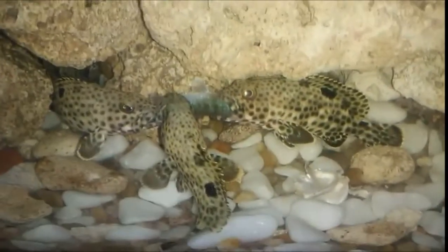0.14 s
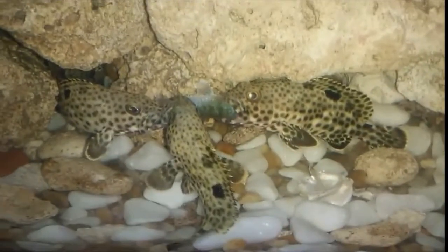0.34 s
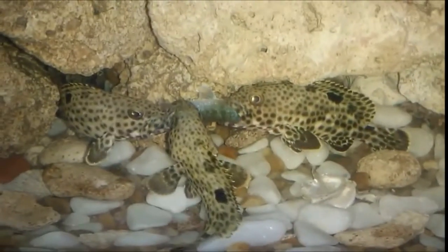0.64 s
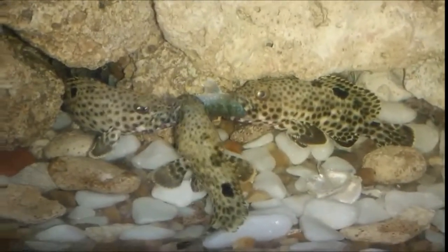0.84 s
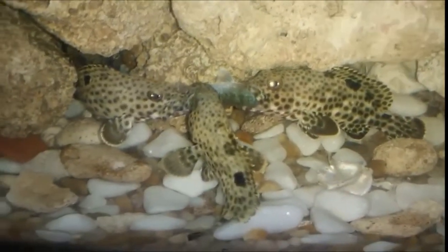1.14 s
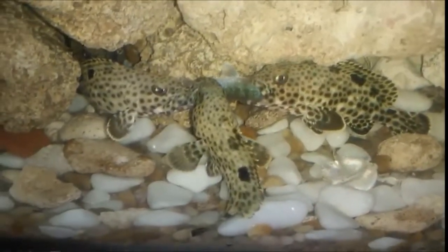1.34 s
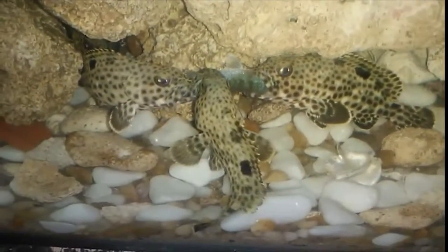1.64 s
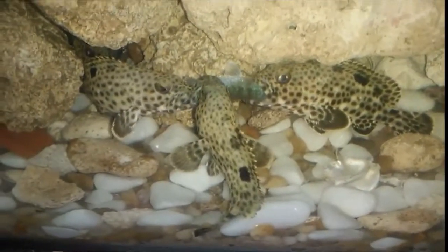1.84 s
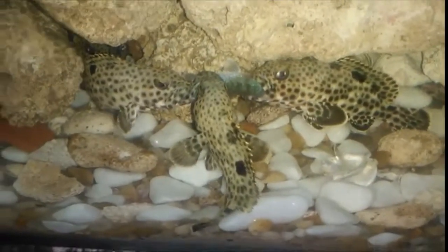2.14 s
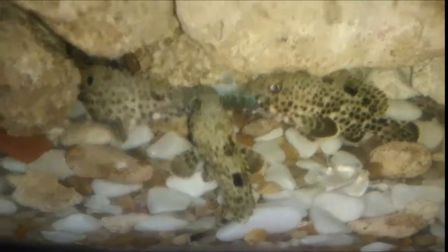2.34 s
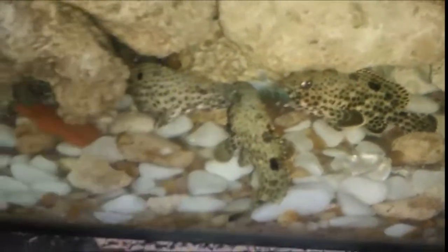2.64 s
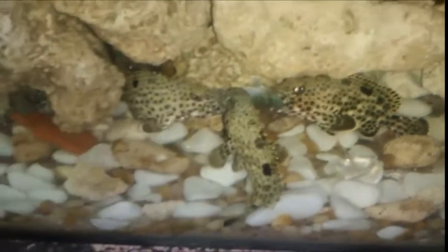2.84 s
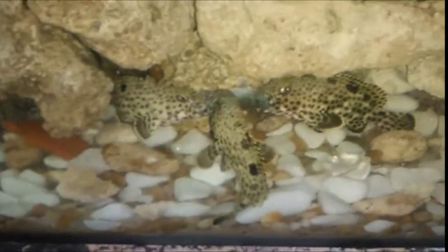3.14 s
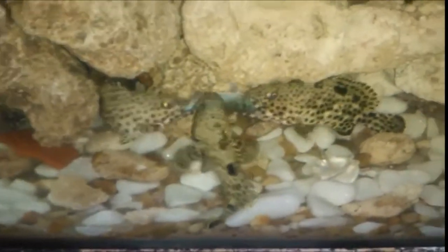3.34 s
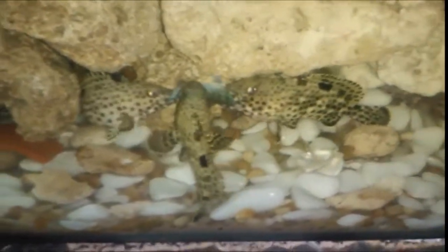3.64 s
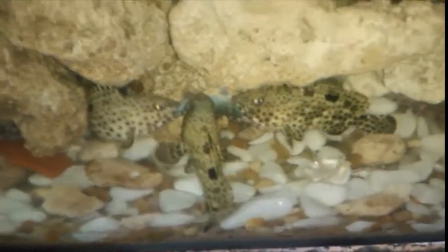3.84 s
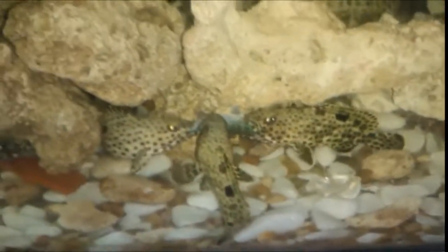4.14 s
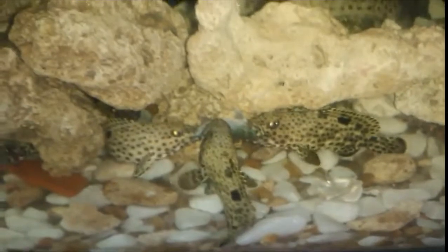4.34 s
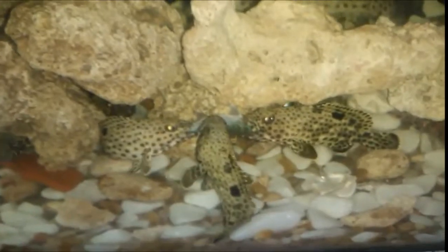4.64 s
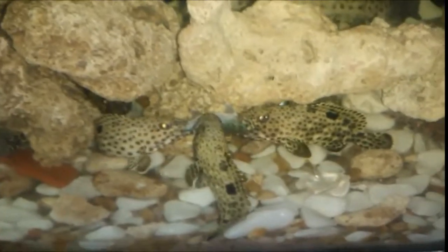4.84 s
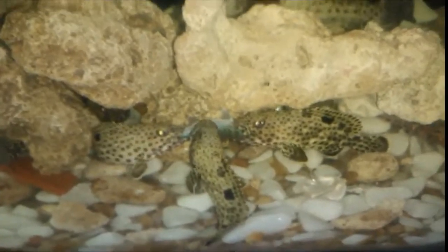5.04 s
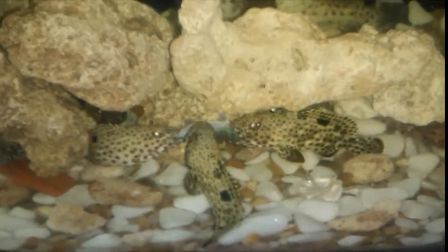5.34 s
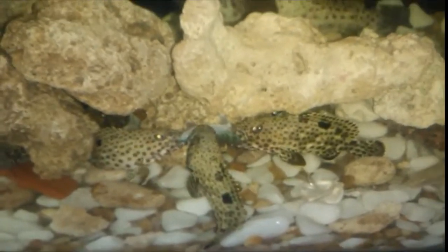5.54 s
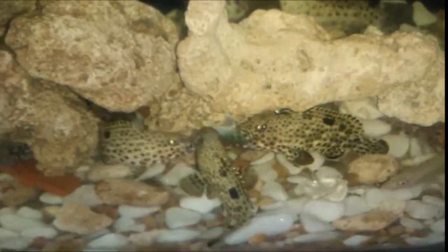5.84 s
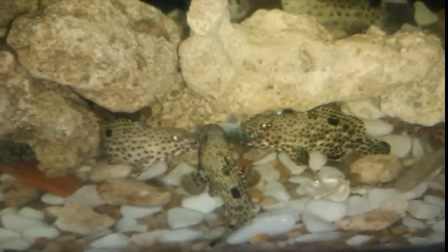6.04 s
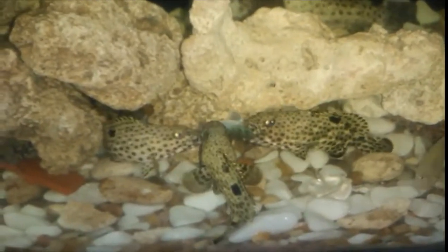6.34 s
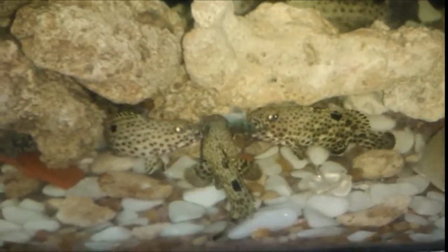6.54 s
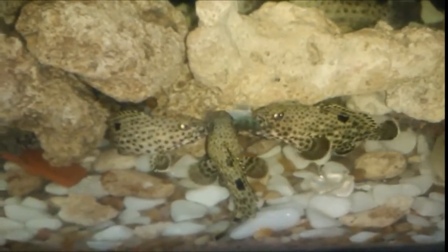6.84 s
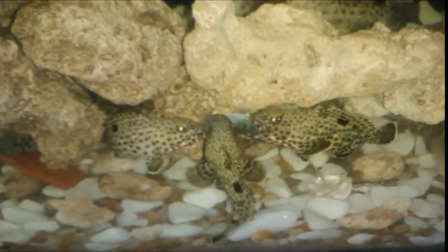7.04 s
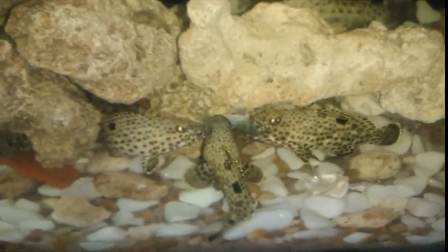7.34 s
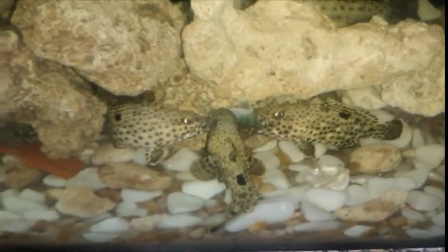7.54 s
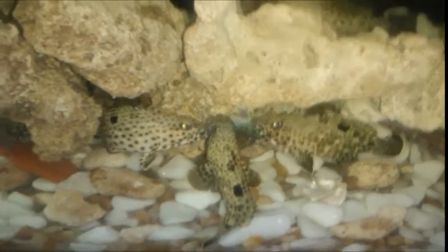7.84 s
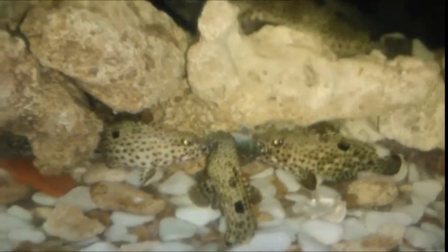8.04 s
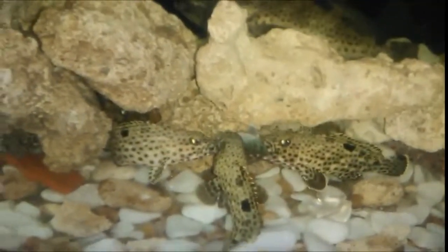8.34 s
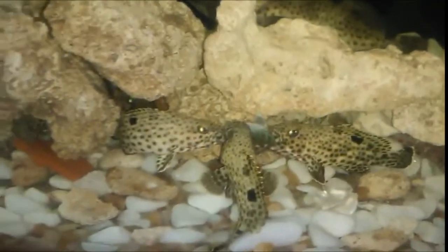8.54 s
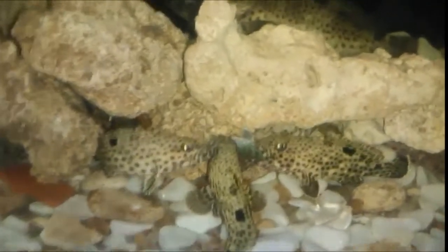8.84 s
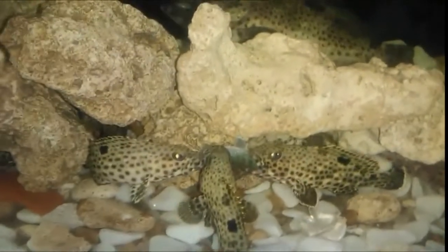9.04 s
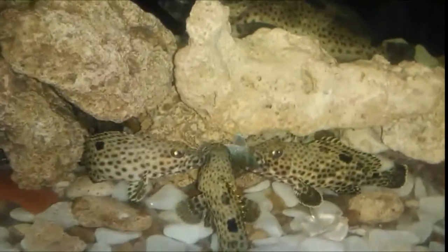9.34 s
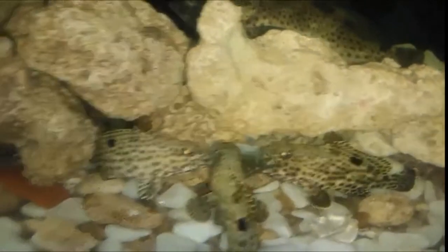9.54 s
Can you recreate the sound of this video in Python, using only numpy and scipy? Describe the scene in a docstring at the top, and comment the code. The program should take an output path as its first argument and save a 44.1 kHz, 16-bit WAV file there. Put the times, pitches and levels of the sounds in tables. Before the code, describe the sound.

Water runs into a fish tank with bubbling, plinking drops and a recurring plop, with two short dropouts and one louder stretch.

```python
"""Water runs into an aquarium: a wash of tiny ringing bubbles that surges with every splash.
Drops plink as they trap air or just smack the surface, spray tinkles faintly and one sharp plop
cuts through, over a pump's hum. It all sounds muffled, in a small room, on the left channel only.
One 1.8 s stretch repeats as a loop, with two silent gaps, one overlap and one louder pass."""
import sys
import numpy as np
from scipy import signal
from scipy.fft import rfft, irfft, next_fast_len
from scipy.io import wavfile
from scipy.ndimage import map_coordinates

SR = 44100
rng = np.random.default_rng(int(sys.argv[2]) if len(sys.argv) > 2 else 0)


def store_wav(level_fs):
    """Save 16-bit WAV to argv[1]."""
    pcm = np.round(np.clip(np.atleast_2d(level_fs), -1, 1) * 32767)
    wavfile.write(sys.argv[1], SR, pcm.T.astype(np.int16))


N = 426888

LOOP_START_S, LOOP_LENGTH_S = 6.5567, 1.8
SIZE = round(LOOP_LENGTH_S * SR)
TIME = LOOP_START_S + np.arange(SIZE) / SR  # the water's cues are timed on the loud pass

# Passes of the loop. Each row: start in seconds, gain in dB.
LOOP_PASSES = [(-.9433, -9.5), (1.0233, -9.5), (2.6567, -9.5), (4.4567, -9.5), (6.5567, 0), (8.3567, -9.5)]
# The pump's hum and the tank tones it stirs. Each row: pitch in Hz, level in dB.
HUM_TONES = [(120, -82), (180, -75), (297, -66.5), (360, -61.5), (420, -71.5), (540, -63), (628, -61.5),
             (948, -68.5), (1002, -81.5), (1620, -69.5), (1920, -61.5), (2818, -59.5)]
# The EQ curve of the wash. Each row: frequency in Hz, level in dB.
WASH_EQ = [(90, -65.5), (150, -37.5), (200, -17.5), (310, -10), (480, -5.5), (660, -1), (900, -8.5),
           (1500, -8.5), (1850, -1), (2400, -5), (2950, -7), (3700, -11.5), (4250, -15), (4450, -47),
           (4900, -25.5)]
# Tank resonances that colour the water. Each row: centre in Hz, width in Hz, gain in dB.
TANK_RESONANCES = [(649, 63, -0.5), (1765, 73, 5), (2010, 150, 2.5), (2730, 25, 7), (2854, 8.7, 11.5),
                   (3045, 110, 4), (3418, 19, 9.5), (4100, 270, 4), (4620, 23, 8.5)]
# Faint, high tinkles of spray. Each row: start in seconds, pitch in Hz, level in dB, attack in seconds.
SPRAY_TINKLES = [(6.745, 6940, -80.5, 0.015), (6.892, 5510, -75, .004), (6.9, 6870, -83.5, 0.0028),
                 (7.191, 7940, -65.5, 0.0016), (7.4, 6480, -67, .002), (7.403, 7500, -75, 0.0014),
                 (7.48, 5400, -73.5, 0.017), (7.539, 5770, -67.5, .043), (7.927, 8450, -84.5, 0.0038),
                 (8.04, 6210, -69.5, .002), (8.122, 7860, -75, 0.0013), (8.189, 7330, -67.5, 0.015),
                 (8.19, 4670, -54, 0.034), (8.343, 7200, -64.5, 0.011)]
# The plop. In order: time in seconds, then pitch in Hz, level in dB and decay time in seconds
# for the snap, then the same three for the thud.
PLOP_HIT = (8.27745, 1690, -22, .00039, 520, -15.5, .00055)
# Drops that smack without ringing. Each row: time of the peak in seconds, pitch in Hz, level in dB.
SURFACE_SMACKS = [(6.809, 2950, -28.5), (7.1496, 2340, -26.5), (7.3124, 2340, -22), (7.6472, 2980, -21.5),
                  (7.6999, 3020, -24.5), (8.3487, 2660, -22)]
# Drops that trap a bubble. Each row: time of the peak in seconds, pitch in Hz, level in dB.
RINGING_DROPS = [(6.6653, 2660, -30.5), (6.7077, 3480, -36), (6.7424, 635, -37.5), (6.8137, 3960, -31),
                 (6.8796, 1800, -42), (7.1528, 2734, -27.5), (7.3132, 1957, -30), (7.3245, 4050, -40),
                 (7.3406, 1081, -42.5), (7.4422, 3590, -40.5), (7.5022, 2990, -37.5), (7.5917, 2880, -33.5),
                 (7.6122, 2826, -30.5), (7.651, 3176, -26.5), (7.707, 2910, -33.5), (7.7207, 2970, -31),
                 (7.752, 645, -40), (8.0499, 1680, -34.5), (8.0823, 1040, -41.5), (8.0941, 3130, -35.5),
                 (8.1523, 2144, -34), (8.1975, 638, -42.5), (8.3476, 718, -39.5)]
# Splashes that stir up bubbles. Each row: start in seconds, centre pitch in Hz, level in dB.
SPLASH_BURSTS = [(6.603, 2100, -48), (6.666, 3900, -45.5), (6.736, 920, -44.5), (6.807, 3700, -45.5),
                 (6.993, 4400, -54.5), (7.242, 3600, -45), (7.31, 2900, -41.5), (7.331, 1370, -43),
                 (7.439, 3500, -56), (7.498, 3900, -53), (7.592, 3170, -48), (7.646, 3190, -44.5),
                 (7.698, 2700, -42), (7.749, 805, -44.5), (7.777, 4000, -48), (7.862, 3600, -47),
                 (8.042, 1310, -44.5), (8.092, 3300, -45), (8.187, 700, -50), (8.19, 4000, -51.5),
                 (8.255, 3820, -46)]
# The stream's strength; only its swing about the mean counts. Each row: time in seconds, level in dB.
FLOW_CURVE = [(6.74, -51), (7.164, -56.5), (7.572, -49.5), (8.024, -52), (8.2, -46.5), (8.33, -49.5)]
# The stream's bubbles, large to tiny. Each row: low edge in Hz, high edge in Hz, level in dB,
# dB gained per dB of flow, level of the near bubbles against their echoes in dB.
BUBBLE_BANDS = [(593.6, 900, -55.5, .6, -7.5), (899, 1597, -54, 0.5, -9), (1600, 2700, -51.5, 0.03, -6),
                (2387, 3500, -49.5, 0.19, -7), (3306, 6600, -62.5, 1.73, -4)]


def amp(db):
    """Decibels to gain."""
    return 10 ** (np.asarray(db) / 20)


def unit(x):
    """Scale to rms 1."""
    return x / np.sqrt(np.mean(x ** 2) + 1e-20)


def filtered(x, response):
    """EQ x with a gain curve given as a function of Hz."""
    m = next_fast_len(x.shape[-1] + 8192)
    return irfft(rfft(x, m) * response(np.fft.rfftfreq(m, 1 / SR)), m)[..., :x.shape[-1]]


def below(hz, edge_hz, order):
    """Gain of a low-pass."""
    return 1 / np.sqrt(1 + (hz / edge_hz) ** (2 * order))


def between(hz, lo, hi, order):
    """Gain of a band-pass."""
    return below(hz, hi, order) * below(lo, hz + 1, order)


def wobble(rate):
    """A smooth random drift, with rate turning points a second."""
    return map_coordinates(rng.standard_normal(256), [np.arange(SIZE) * rate / SR], mode="wrap")


def room(x, t60):
    """The small room's diffuse reverb, wet only and about as strong as x."""
    t = np.arange(SR // 3) / SR
    tail = rng.standard_normal(len(t)) * amp(-60 * t / t60) * (1 - np.exp(-t / 0.0038))
    return signal.fftconvolve(x, tail / np.linalg.norm(tail))[:SIZE]


def tank(hz):
    """The tank's tone as a gain curve: the broad wash EQ plus narrow resonances."""
    eq_hz, eq_db = np.transpose(WASH_EQ)
    wash_db = np.interp(np.log(hz + 1), np.log(eq_hz + 1), eq_db)
    resonance_db = sum(db / (1 + (2 * (hz - centre) / width) ** 2)
                       for centre, width, db in TANK_RESONANCES)
    return amp(wash_db + resonance_db)


def pump():
    """The pump lays a steady bed: low churn, slightly wavering hum and a faint hiss."""
    churn = filtered(rng.standard_normal(SIZE), lambda hz: tank(hz) * between(hz, 185, 523, order=14))
    hum = np.zeros(SIZE)
    for pitch, db in HUM_TONES:
        level = amp(db + wobble(3.7)) * np.sqrt(2)
        phase_drift = pitch / 2500 * wobble(2.9)
        hum += level * np.sin(2 * np.pi * pitch * TIME + phase_drift)
    hiss = filtered(rng.standard_normal(SIZE), lambda hz: below(hz, 7000, order=1))
    return amp(-56) * unit(churn) + hum + amp(-76.5) * hiss


def thin_ring(pitch, half_width_hz):
    """A narrow, noisy ring of rms 1."""
    noise = rng.standard_normal(SIZE)
    return unit(filtered(noise, lambda hz: 1 / (1 + ((hz - pitch) / half_width_hz) ** 2)))


def tinkles(t60=0.26):
    """Bursting spray swells quickly into a thin ring that dies away in the room."""
    out = np.zeros(SIZE)
    for start, pitch, db, attack in SPRAY_TINKLES:
        age = np.maximum(TIME - start, 0)
        envelope = np.minimum(age / attack, 1) * amp(db - 60 * np.maximum(age - attack, 0) / t60)
        out += envelope * thin_ring(pitch, half_width_hz=.015 * pitch)
    return out


def plop():
    """One sharp, dry plop: a single-cycle snap and a low thud that dies at once."""
    hit_s, snap_hz, snap_db, snap_decay, thud_hz, thud_db, thud_decay = PLOP_HIT
    t = TIME - hit_s
    snap = amp(snap_db) * np.exp(-(t / snap_decay) ** 2) * np.sin(2 * np.pi * snap_hz * t)
    age = np.maximum(t, 0)
    thud = amp(thud_db) * np.exp(-age / thud_decay) * np.sin(2 * np.pi * thud_hz * age)
    # so small a splash radiates no bass
    thud = signal.sosfilt(signal.butter(2, 220, "highpass", fs=SR, output="sos"), thud)
    return filtered(snap + thud, lambda hz: between(hz, 230, 2600, order=12))


def spatter(t, pitch, decay_s):
    """The wet edge of a drop: a noise burst about an octave wide, peaking at t = 0."""
    burst = rng.standard_normal(SIZE) * np.exp(-np.abs(t) / decay_s)
    return filtered(burst, lambda hz: between(hz, pitch / 1.4, pitch * 1.4, order=6))


def smacks(click_s=.0007):
    """Drops hit the surface: each a tight click inside a short spatter, with a touch of room."""
    hits = np.zeros(SIZE)
    for peak_s, pitch, db in SURFACE_SMACKS:
        t = TIME - peak_s
        click = np.exp(-(t / click_s) ** 2) * np.sin(2 * np.pi * pitch * t)
        hits += amp(db - 2.5) * (click + amp(-2.5) * spatter(t, pitch, decay_s=.0025))
    return filtered(hits + amp(-8) * room(hits, t60=0.22), lambda hz: below(hz, 3750, order=20))


def bubble(t, hz, swell, glide):
    """A bubble swells to its peak at t = 0, then rings out, bending up as it nears the surface."""
    age = np.clip(t / swell + 2, 0, 24)  # counted in swell times; the attack takes two
    envelope = (age / 2) ** 2 * np.exp(2 - age)
    return envelope * np.sin(2 * np.pi * hz * (t + glide * swell * np.logaddexp(age - 2, 2 - age)))


def drops(swell_cycles=4.66):
    """Each drop spatters and traps a bubble that plinks into the room; large ones ring longer."""
    out = np.zeros(SIZE)
    for peak_s, pitch, db in RINGING_DROPS:
        t = TIME - peak_s
        spatter_db = -7.5 - np.log2(pitch / 3000)  # 1 dB softer per octave up
        splash = amp(spatter_db) * spatter(t, pitch, decay_s=0.0034)
        ring = bubble(t, pitch, swell_cycles / pitch, glide=0.032)
        plink = amp(db - 2.26) * (ring + splash)
        out += plink + amp(-6) * room(plink, t60=0.32)
    return filtered(out, lambda hz: below(hz, 3960, order=24))


def surge(hz, attack_s=0.0057, t60=0.28):
    """The power that splashes add to bubbles of one pitch: a fast attack, then a tail in the room."""
    power = np.zeros(SIZE)
    for start, pitch, db in SPLASH_BURSTS:
        age = np.maximum(TIME - start, 0)
        level_db = db - 14 * np.log2(hz / pitch) ** 2 - 60 * age / t60  # 14 dB down an octave away
        power += (amp(level_db) * np.minimum(age / attack_s, 1)) ** 2
    return power


def bubble_cloud(count, swell_cycles, scatter_db):
    """A fine texture of small bubbles, random in timing, pitch and level."""
    start, pitch, softness = rng.random((count, 3)).T[:, :, None]
    hz = 250 + 4600 * pitch
    swell = np.minimum(swell_cycles / hz, .003)
    offsets = np.arange(SR // 50)
    tones = bubble(offsets / SR - 2 * swell, hz, swell, glide=0.036) / np.sqrt(swell)
    gain = amp(-scatter_db * np.log(np.maximum(softness, .02)))
    positions = (start * SIZE).astype(int) + offsets
    return unit(np.bincount(positions.ravel(), (gain * tones).ravel(), SIZE)[:SIZE])


def stream(fine_onset_db=-51.5, fizz_hz=4480):
    """Near bubbles ride on the blur of their echoes, following the flow and surging with splashes."""
    flow_db = np.interp(TIME, *np.transpose(FLOW_CURVE))
    flow_db -= flow_db.mean()
    water = np.zeros(SIZE)
    for lo, hi, db, follows, near_db in BUBBLE_BANDS:
        echoes = rng.standard_normal(SIZE)
        near = amp(near_db) * bubble_cloud(count=1600, swell_cycles=2.778, scatter_db=2.5)
        band = filtered(echoes + near, lambda hz: tank(hz) * between(hz, lo, hi, order=16))
        level = np.sqrt(amp(db + follows * flow_db) ** 2 + surge(np.sqrt(lo * hi)))
        water += level * unit(band)
    spray_level = level  # the last, highest band; in the lulls it loses its finest bubbles first
    fine_share = 1 / (1 + (amp(fine_onset_db) / spray_level) ** 4)
    dull = filtered(water, lambda hz: below(hz, 4580, order=24))
    fizz = amp(-20) * np.sqrt(surge(fizz_hz)) * thin_ring(fizz_hz, half_width_hz=170)
    return filtered(dull + fine_share * (water - dull) + fizz, lambda hz: below(hz, 4760, order=36))


def scene():
    """The same stretch of water cuts hard in and out at every pass; the right channel stays silent."""
    loop = stream() + drops() + smacks() + tinkles() + plop() + pump()
    left = np.zeros(N)
    for start, db in LOOP_PASSES:
        playhead = np.arange(N) - round(start * SR)
        left += amp(db) * np.interp(playhead, np.arange(SIZE), loop, left=0, right=0)
    return np.array([amp(6) * left, np.zeros(N)])


def record(dry):
    """A steep high cut takes the very top off the mix."""
    return filtered(dry, lambda hz: below(hz, 15750, order=60))


dry = scene()
out = record(dry)
store_wav(out)
```